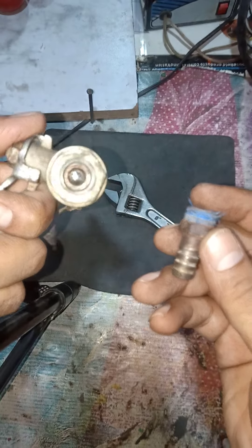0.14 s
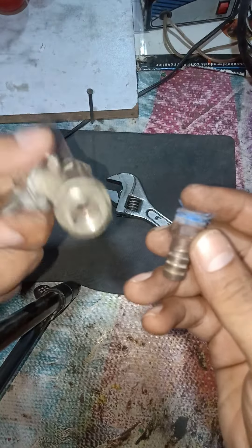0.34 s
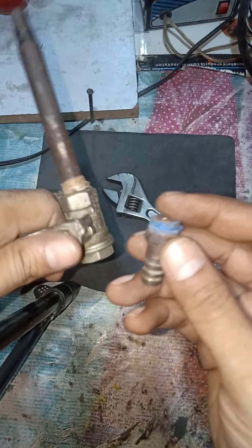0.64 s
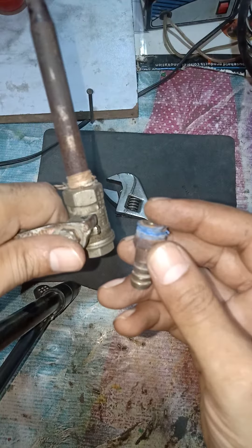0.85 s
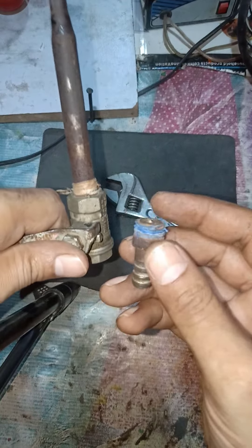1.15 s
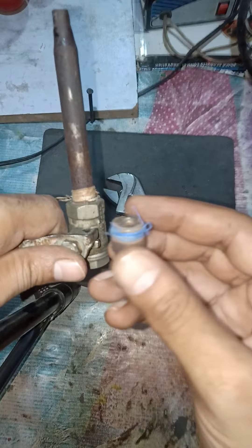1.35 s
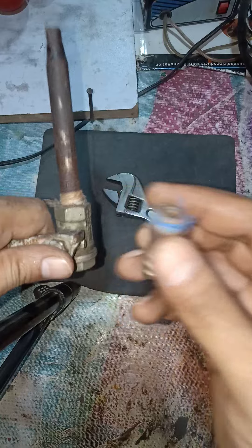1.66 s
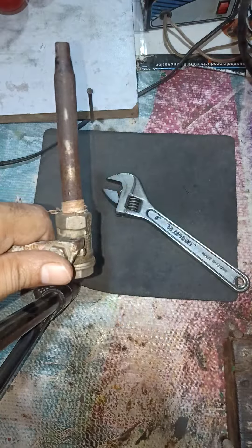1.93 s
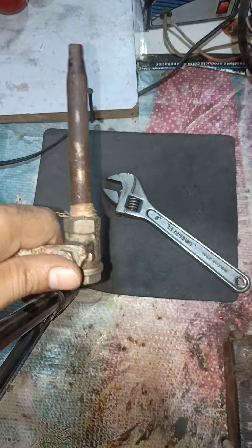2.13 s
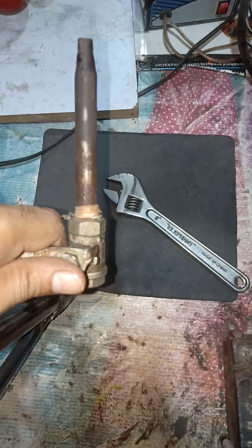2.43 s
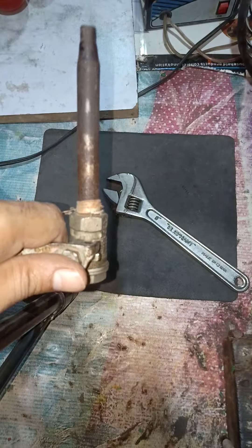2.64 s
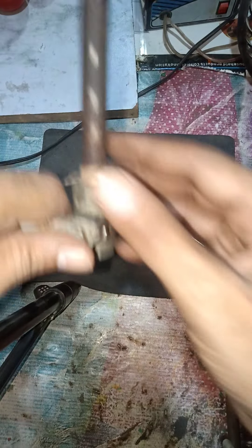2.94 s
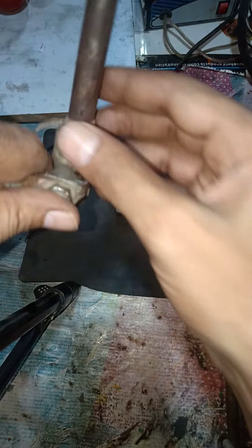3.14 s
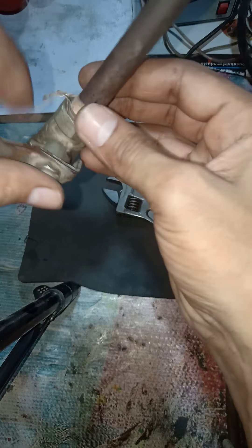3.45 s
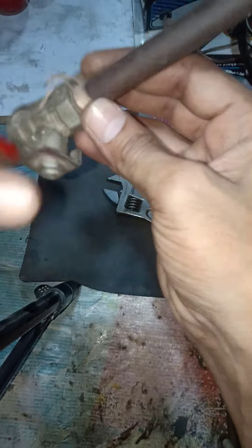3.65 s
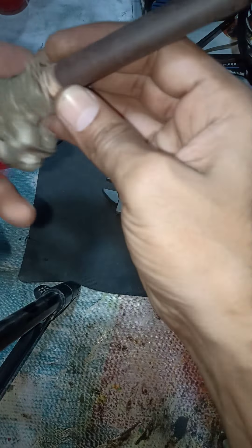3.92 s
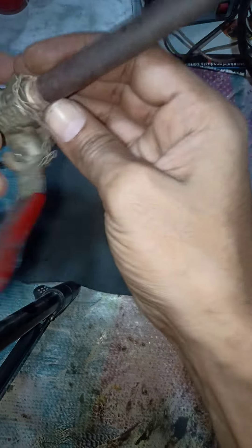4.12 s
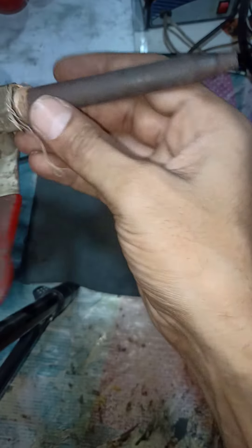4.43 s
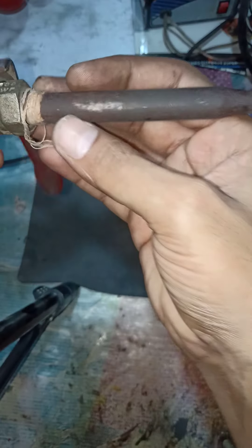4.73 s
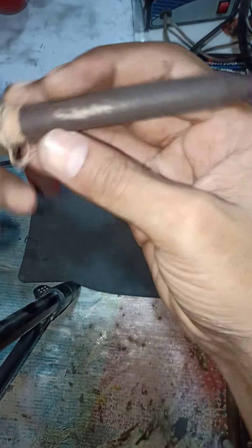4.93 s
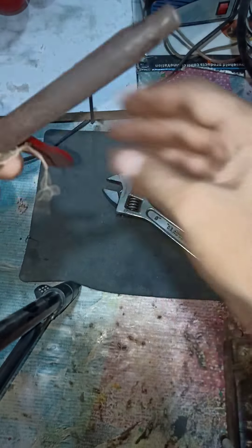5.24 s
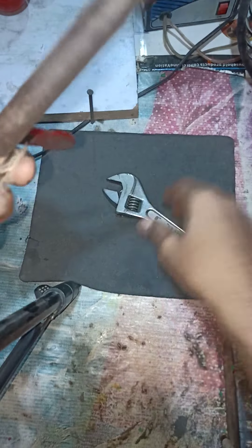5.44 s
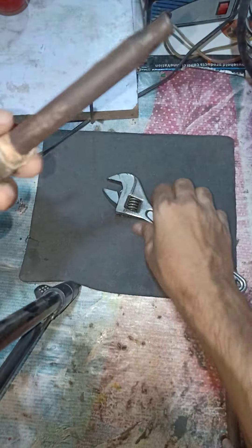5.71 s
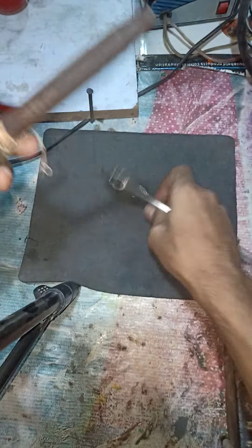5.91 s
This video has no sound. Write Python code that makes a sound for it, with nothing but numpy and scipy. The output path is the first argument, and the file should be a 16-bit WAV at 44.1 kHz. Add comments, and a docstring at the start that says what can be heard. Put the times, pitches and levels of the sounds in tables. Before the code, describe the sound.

Fluttering low wind rumble and airy fan hiss over a workbench, broken by a metal fitting bumping down and faint spanner ticks at the end.

```python
"""A low rumble comes in puffs: a fan runs over a workbench and its draught buffets the microphone.
Behind it the blades hiss, with faint whistles and a flutter at twice the mains rate.
A brass fitting clinks and bumps on the bench as it is put down; a spanner ticks lightly as it is picked up.
Wind is shaped noise, short swells and pressure steps; metal and bench are decaying modes with noise bursts."""
import sys
import numpy as np
from scipy import signal
from scipy.fft import rfft, irfft, next_fast_len
from scipy.io import wavfile
from scipy.ndimage import uniform_filter1d

SR = 44100
rng = np.random.default_rng(int(sys.argv[2]) if len(sys.argv) > 2 else 0)


def generate_wav(sig):
    """Save sig (samples, or channels by samples) to the path in sys.argv[1] as 16-bit PCM at SR."""
    pcm = np.round(np.clip(np.atleast_2d(sig).T, -1, 1) * 32767).astype(np.int16)
    wavfile.write(sys.argv[1], SR, pcm)


N = 267677
TIME = np.arange(N) / SR

# strength of the draught at the microphone: time_s, force_db
DRAUGHT_CURVE = [(0.0, -15.5), (0.56, -16.5), (1.62, -20.5), (2.04, -22), (2.27, -14), (2.48, -21.5),
                 (2.72, -16), (2.87, -25.5), (3.09, -29), (3.21, -20), (3.58, -26.5), (3.75, -20),
                 (4.07, -22), (4.21, -17.5), (5.0, -24.5), (5.24, -20.5), (5.7, -12), (6.07, -14.5)]
MEAN_DRAUGHT_DB = -20
# a hand held close reflects the upper hiss into the microphone: time_s, lift_db
HAND_CURVE = [(0, 0.5), (2.8, 0.5), (3.3, 3), (4.1, 4), (4.5, 2), (4.9, 1.85), (5.3, 4), (6.07, 3)]
EDDY_HZ, EDDY_SPREAD_OCTAVES = 163.5, 0.18


def from_db(db):
    """Decibels to gain."""
    return 10 ** (np.asarray(db) / 20)


def rms_one(x):
    """Scale to rms 1."""
    return x / np.sqrt(np.mean(x ** 2) + 1e-20)


def in_time(rows):
    """Each column of a curve at every sample."""
    s, *columns = np.transpose(rows)
    return [np.interp(TIME, s, c) for c in columns]


def add(out, sound, s):
    """Mix a short sound in from time s."""
    at = int(round(s * SR))
    first, last = max(at, 0), min(at + len(sound), N)
    out[first:last] += sound[first - at:last - at]


def band(x, low_hz, high_hz, order=2):
    """Butterworth band-pass."""
    sos = signal.butter(order, [low_hz, high_hz], "band", fs=SR, output="sos")
    return signal.sosfilt(sos, x)


def noise(spectrum):
    """Steady noise of a given colour, rms 1."""
    hz, db = np.transpose(spectrum)
    size = next_fast_len(N)
    bins_hz = np.arange(size // 2 + 1) * SR / size
    gain = from_db(np.interp(np.log(bins_hz + 1), np.log(hz), db))
    shaped = irfft(rfft(rng.standard_normal(size)) * gain, size)
    return rms_one(shaped[:N])


def drift(rate_hz, size=N):
    """Slow chance with rms 1: white noise through a double pole."""
    r = np.exp(-2 * np.pi * rate_hz / SR)
    settle = SR // 4
    slow = signal.lfilter([1], [1, -2 * r, r * r], rng.standard_normal(size + settle))
    return rms_one(slow[settle:])


def evened(x, span_s):
    """Keep the wiggles of a noise and hold its level at rms 1."""
    power = uniform_filter1d(x ** 2, max(int(span_s * SR), 2))
    return x / np.sqrt(power + 1e-12)


def draught(rumble_db=-20.5, rumble_follows=0.68, eddies_db=-38.0, eddies_follow=0.14, lumpy_db=3.5):
    """Turbulence on the microphone port: large and small eddies surge together; a close hand adds small ones."""
    # spectra: freq_hz, level_db_per_hz
    large_spectrum = [(15, -45), (25, -31.5), (40, -15.5), (70, -1), (110, 1.5), (170, -1.5), (260, -5.5),
                      (420, -15.5), (600, -19), (1000, -38.5), (2000, -81.5), (8000, -140)]
    small_spectrum = [(20, -75), (200, -19.5), (400, 3), (520, -5), (650, -5.5), (800, -2.5), (1000, -15),
                      (1400, -23.5), (3000, -53.5), (8000, -120)]
    force_db = in_time(DRAUGHT_CURVE)[0] - MEAN_DRAUGHT_DB
    (lift_db,) = in_time(HAND_CURVE)
    surge_db = lumpy_db * drift(28)
    large_db = rumble_db + rumble_follows * force_db + surge_db / 2
    small_db = eddies_db + eddies_follow * force_db + lift_db + surge_db
    large = from_db(large_db) * evened(noise(large_spectrum), 0.066)
    small = from_db(small_db) * noise(small_spectrum)
    return large + small


def blades(fizz_db=-22.0, flutter_hz=100.64, flutter_depth=0.22):
    """Air through the blades: hiss with faint whistles; its middle and a thin fizz pulse at twice the mains rate."""
    # air rushing through the blades: time_s, hiss_db
    rush_curve = [(0, -33.5), (.22, -31.5), (.4, -34.5), (.48, -33.5), (1.5, -35), (1.66, -37), (1.77, -35),
                  (2.95, -37), (3.74, -32), (3.86, -38.5), (3.98, -33), (4.3, -35), (4.92, -35.5),
                  (5.3, -30), (5.62, -31.5), (5.8, -35.5), (6.07, -36)]
    # spectra: freq_hz, level_db_per_hz
    hiss_spectrum = [(400, -19), (900, -3), (1400, -2), (1700, 0.4), (2000, 1), (2500, -5.5), (2850, -3),
                     (3500, -9), (4400, -16), (5400, -28), (6800, -23.5), (9700, -39.5), (11300, -40),
                     (12500, -39.5), (13600, -32.5), (16000, -45)]
    fizz_spectrum = [(2000, -32.5), (3500, -13.5), (5400, -15.5), (7000, -7.5), (9700, -9), (11300, -3),
                     (12500, -4.5), (13600, 1), (15500, 2.5)]
    # whistles of the guard: freq_hz, width_hz, level_db (against the hiss)
    whistle_table = [(1470, 43, -26), (1632, 6.4, -13.5)]
    (rush_db,), (lift_db,) = in_time(rush_curve), in_time(HAND_CURVE)
    pulse = np.cos(2 * np.pi * flutter_hz * TIME)
    hiss = noise(hiss_spectrum)
    hiss = hiss + flutter_depth * pulse * band(hiss, 1300, 3300)
    # the hand lifts one band; half the lift comes off the whole hiss
    reflected = (from_db(lift_db) - 1) * band(hiss, 2450, 3750, order=1)
    hiss = (hiss + reflected) * from_db(-lift_db / 2)
    fizz = from_db(fizz_db) * rms_one(noise(fizz_spectrum) * np.exp(pulse))
    whistles = np.zeros(N)
    for hz, width_hz, db in whistle_table:
        tone = band(rng.standard_normal(N), hz - width_hz / 2, hz + width_hz / 2, order=1)
        whistles += from_db(db) * rms_one(tone)
    return from_db(rush_db) * (hiss + fizz + whistles)


def eddies():
    """Strong gusts, with ordinary eddies at a loose beat between them that follow the draught."""
    # strong gusts: front_s, length_s (before stretch), level_db and step_db (before trims), pitch_hz
    gust_table = [(0.056, 0.014, -3.5, -17, 171), (0.386, 0.014, -8, -21.5, 190),
                  (0.522, 0.033, -11, -14, 167.5), (0.603, 0.0078, -8, -14, 212),
                  (0.633, 0.022, -18, -13, 180), (0.666, 0.018, -5.5, -24, 195),
                  (0.893, 0.0094, -3.5, -27, 200), (1.067, 0.017, -12.5, -9.5, 223.4),
                  (1.142, 0.038, -8.5, -25, 166), (1.439, 0.021, -10, -12.5, 168),
                  (1.513, 0.023, -10, -38, 176), (1.577, 0.028, -8, -9.5, 168),
                  (1.654, 0.011, -9.5, -14.5, 180), (1.795, 0.021, -11, -21, 184.2),
                  (1.833, 0.011, -6, -29, 180), (2.122, 0.06, -11.5, -9, 187.4),
                  (2.19, 0.0081, -4, -11, 162), (2.263, .02, -9, -12.5, 182.7),
                  (2.427, 0.037, -14, -15, 182), (2.536, 0.027, -5.5, -18, 196.4),
                  (2.847, 0.042, -10.5, -10, 152), (3.085, 0.023, -7.5, -13.5, 160),
                  (3.2, 0.01, -5, -19, 152), (3.356, 0.023, -6.5, -11.5, 147),
                  (3.55, 0.018, -9.5, -34.5, 141), (3.778, 0.0063, -3, -19.5, 194.7),
                  (3.825, 0.015, -7.5, -20, 178), (3.922, 0.022, -7.5, -9, 193.5),
                  (4.061, 0.022, -9, -19, 172.3), (4.197, 0.019, -5.5, -19, 178),
                  (4.273, 0.026, -6, -29, 183.8), (4.319, 0.021, -10, -11, 161),
                  (4.363, 0.02, -9, -17, 158), (4.564, 0.0077, -3, -27, 144),
                  (4.722, 0.009, -3.5, -17.5, 217.8), (4.866, .017, -4, -14.5, 187),
                  (5.36, 0.018, -7.5, -34, 154), (5.585, .022, -5.5, -17, 178.9),
                  (5.619, 0.015, -8.5, -12, 175), (5.878, 0.0097, -6, -13.5, 165.1),
                  (5.926, .009, -4.5, -14.5, 214)]
    eddies_per_s, jitter_beats = 13.4, 0.2
    length_s, clearance_s = 0.016, 0.05
    # at mean draught, and growth in dB per dB of draught
    level_db, level_growth = -13, 0.5
    step_db, step_growth = -27.5, 0.91
    force_spread_db = 0.5
    beats = np.arange(int(N / SR * eddies_per_s))
    late, strong, long, high = np.clip(rng.standard_normal((len(beats), 4)), -2, 2).T
    s = np.clip((beats + 0.5 + jitter_beats * late) / eddies_per_s, 0, N / SR)
    force_db = np.interp(s, *np.transpose(DRAUGHT_CURVE)) - MEAN_DRAUGHT_DB + force_spread_db * strong
    ordinary = np.column_stack([
        s,
        length_s * 2 ** (long / 2),
        level_db + level_growth * force_db,
        step_db + step_growth * force_db,
        EDDY_HZ * 2 ** (EDDY_SPREAD_OCTAVES * high),
    ])
    # a strong gust takes the place of any ordinary eddy this near
    free = np.abs(s[:, None] - np.array(gust_table)[:, 0]).min(axis=1) > clearance_s
    return np.vstack([gust_table, ordinary[free]])


def loose_steps(per_s=2.2, growth=3.2, level_db=-17.5, spread_db=3.0):
    """A strong draught breaks up into loose pressure steps, the more the stronger it is: time_s, step_db, pitch_hz."""
    # rate at mean draught, growth in dB per dB
    rate = per_s * from_db(growth * (in_time(DRAUGHT_CURVE)[0] - MEAN_DRAUGHT_DB))
    due = np.cumsum(rate) / SR
    late, strong, high = rng.uniform(-1, 1, (int(due[-1]), 3)).T
    s = np.interp(np.arange(len(late)) + 0.5 + late / 2, due, TIME)
    hz = EDDY_HZ * 2 ** (2 * EDDY_SPREAD_OCTAVES * high)
    return np.column_stack([s, level_db + spread_db * strong, hz])


def puffs(rows, trim_db=-2.12, stretch=0.58, lag_s=0.002997):
    """Each eddy is a short swell of turbulence around and below its pitch, just behind its pressure front."""
    out, t = np.zeros(N), np.arange(-SR // 8, SR // 8) / SR
    for s, length_s, db, hz in rows:
        envelope = np.exp(-(t / (stretch * length_s)) ** 2 / 2)
        swirl = band(rng.standard_normal(len(t)), hz / 1.82, hz, order=1)
        swirl = evened(swirl, 0.014)
        swirl = envelope * band(swirl, 62.3, hz * 2.244, order=3)
        gain = from_db(db + trim_db) * np.sqrt(np.mean(envelope ** 2))
        add(out, gain * rms_one(swirl), s + lag_s + t[0])
    return out


def slaps(rows, flip_db=15.5, flip_hz=222.6, port_hz=110, wake_db=-6.5, wake_t60_s=0.044):
    """Pressure flips within milliseconds and leaves a wake of small eddies; the port leaks the lowest part."""
    out, t = np.zeros(N), np.arange(-SR // 100, SR // 12) / SR
    for s, db, hz in rows:
        # flip_hz holds at the mean eddy pitch
        u = np.clip(2 * np.pi * flip_hz * hz / EDDY_HZ * t, -20, 20)
        flip = from_db(flip_db) * rng.choice([-1, 1]) * np.tanh(u) / np.cosh(u)
        onset = (1 + np.tanh(u)) / 2
        wake = rms_one(band(rng.standard_normal(len(t)), 270, 560))
        wake = wake * from_db(wake_db - 60 * t / wake_t60_s) * onset
        add(out, from_db(db) * (flip + wake), s + t[0])
    return signal.sosfilt(signal.butter(2, port_hz, "high", fs=SR, output="sos"), out)


def struck(modes, t, waver):
    """Decaying modes of a part that rocks, so that each wavers in strength."""
    out = np.zeros(len(t))
    for hz, db, t60_s in modes:
        strength = from_db(db - 60 * t / t60_s) * (1 + waver * drift(31, size=len(t)))
        out += strength * np.sin(2 * np.pi * (hz * t + rng.random()))
    return out


def fitting(ring_db=-2.5, crack_db=-31.0, crack_t60_s=0.1, clack_db=-25.5, clack_t60_s=0.26):
    """Each contact chatters briefly, which builds up the brass modes, over a bright crack and a lower clack."""
    # contacts with other metal: start_s, level_db, chatter_s
    clink_table = [(2.52, 0.5, 0.011), (2.5598, -8.5, 0.0044)]
    # brass modes: freq_hz, level_db (before ring_db), t60_s
    brass_modes = [(3398, -28, .09), (3541, -19, .13), (4147, -26, .1), (5762, -42, .13), (6789, -24, .14),
                   (6880, -33, .06), (7327, -26, .15), (8296, -48, .12), (9520, -33, .12), (9626, -42, .33),
                   (9798, -28, .24), (9898, -39, .19), (10563, -44, .3), (12608, -45, .3),
                   (14536, -34, .13), (14620, -34, .19), (14980, -36, .13), (15290, -40, .1)]
    out, t = np.zeros(N), np.arange(SR // 2) / SR
    for s, db, chatter_s in clink_table:
        build_up = 1 - np.exp(-6 * t / chatter_s)
        ring = from_db(ring_db) * struck(brass_modes, t, waver=0.24) * build_up
        white = rng.standard_normal((2, len(t)))
        crack = rms_one(band(white[0], 3012, 15800, order=1))
        crack = from_db(crack_db - 60 * t / crack_t60_s) * crack
        clack = rms_one(band(white[1], 1380, 3600, order=4))
        clack = from_db(clack_db - 60 * t / clack_t60_s) * clack
        add(out, from_db(db) * (ring + crack + clack), s)
    return out


def swell(start_s=2.57, level_db=-46, hz=10563, attack_s=0.048, hold_s=0.04, t60_s=0.3):
    """As the fitting settles one high mode swells, holds and dies away."""
    since_s = TIME - start_s
    attack = np.clip(since_s / attack_s, 0, 1)
    release_db = -60 * np.maximum(since_s - attack_s - hold_s, 0) / t60_s
    return attack * from_db(level_db + release_db) * np.sin(2 * np.pi * hz * TIME)


def bench(rise_s=0.00088, contact_t60_s=0.034, clutter_db=-16.5, clutter_t60_s=0.13):
    """The padded bench top answers each bump with a dull thud and shakes the things on it."""
    # the fitting drops on the bench top: start_s, level_db, hard_contact_db
    thud_table = [(2.589, 5, -44), (2.604, -6, -25.5), (2.625, -1.5, -50)]
    # bench-top modes: freq_hz, level_db, t60_s
    bench_modes = [(279.3, -13, 0.16), (343, -27, 0.061), (520, -20, 0.18), (616, -41, 0.076),
                   (870, -27.5, .14), (1052, -24, 0.044)]
    out, t = np.zeros(N), np.arange(SR // 3) / SR
    for s, db, contact_db in thud_table:
        white = rng.standard_normal((2, len(t)))
        clutter = rms_one(band(white[0], 350, 655))
        clutter = from_db(clutter_db - 60 * t / clutter_t60_s) * clutter
        body = struck(bench_modes, t, waver=0.53) + clutter
        thud = from_db(db) * body * (1 - np.exp(-t / rise_s))
        contact = rms_one(band(white[1], 1900, 2200))
        contact = from_db(contact_db - 60 * t / contact_t60_s) * contact
        add(out, thud + contact, s)
    return out


def spanner(t60_s=0.025):
    """Light ticks of band-passed noise, damped at once by the hand."""
    # the spanner is lifted: start_s, peak_db, pitch_hz
    tick_table = [(5.946, -43.5, 10900), (6.038, -33, 7000)]
    out, t = np.zeros(N), np.arange(SR // 10) / SR
    for s, db, hz in tick_table:
        tick = band(rng.standard_normal(len(t)), hz / 1.35, hz * 1.07) * from_db(-60 * t / t60_s)
        add(out, from_db(db) * tick / np.abs(tick).max(), s)
    return out


def scene():
    """Wind on the microphone, the fan behind it, metal parts close by."""
    steady = draught() + blades()
    s, length_s, db, step_db, hz = eddies().T
    steps = [*zip(s, step_db, hz), *loose_steps()]
    wind = puffs(zip(s, length_s, db, hz)) + slaps(steps)
    parts = fitting() + swell() + bench() + spanner()
    return (steady + wind + parts)[None]


def record(dry, cutoff_hz=15600):
    """The deepest rumble is shed, the strongest gusts are rounded off, the top is cut."""
    held = signal.sosfilt(signal.butter(3, 32, "high", fs=SR, output="sos"), dry)
    rounded = held / (1 + held ** 6) ** (1 / 6)
    return signal.sosfilt(signal.ellip(12, 0.2, 80, cutoff_hz, fs=SR, output="sos"), rounded)


dry = scene()
out = record(dry)
generate_wav(out)
```